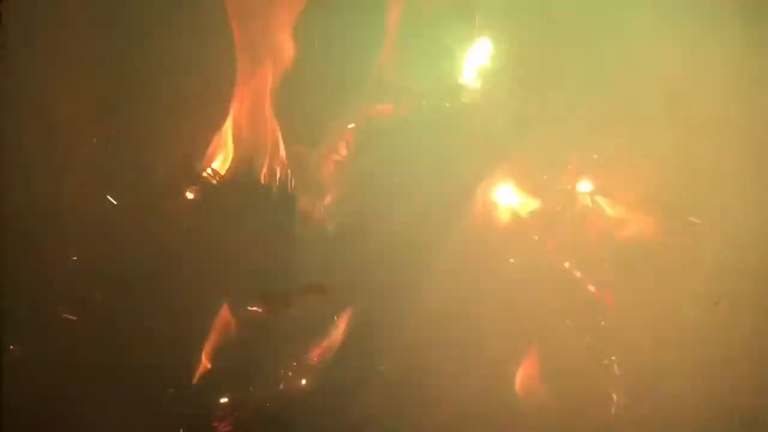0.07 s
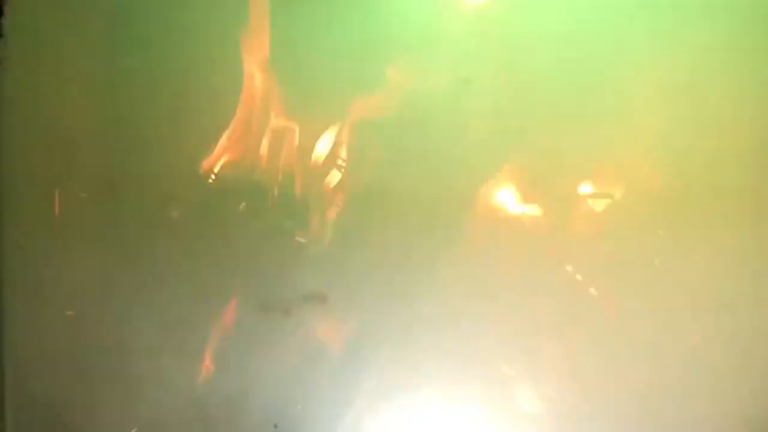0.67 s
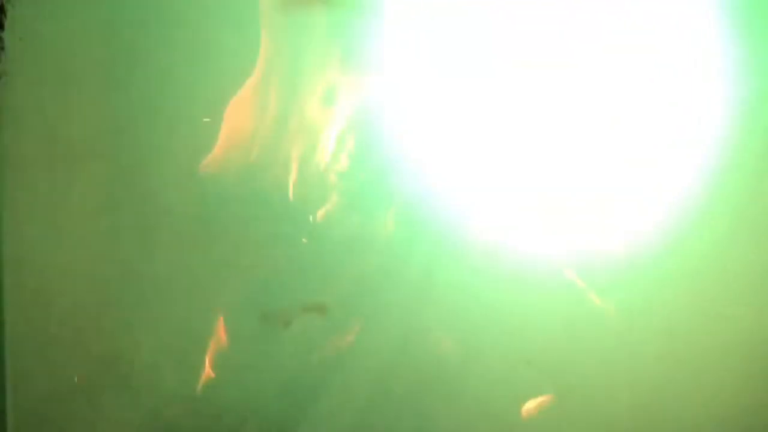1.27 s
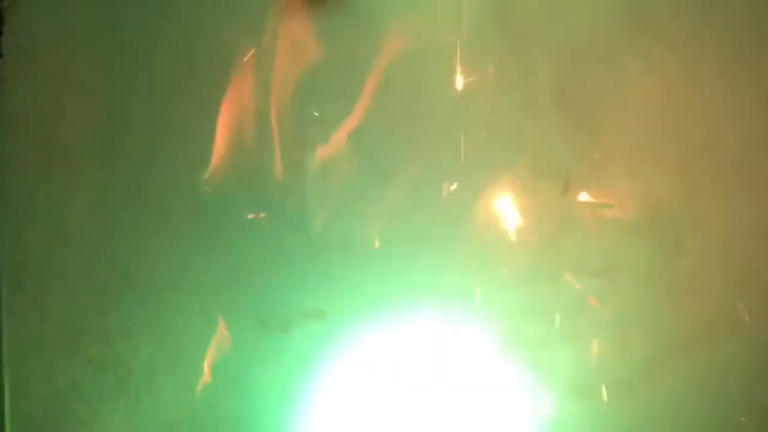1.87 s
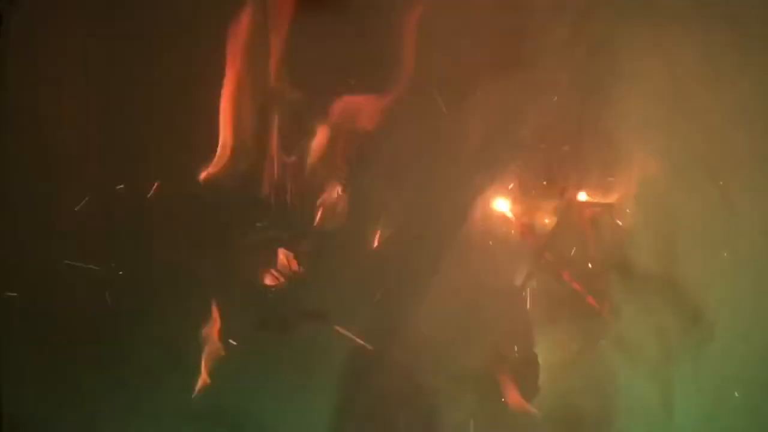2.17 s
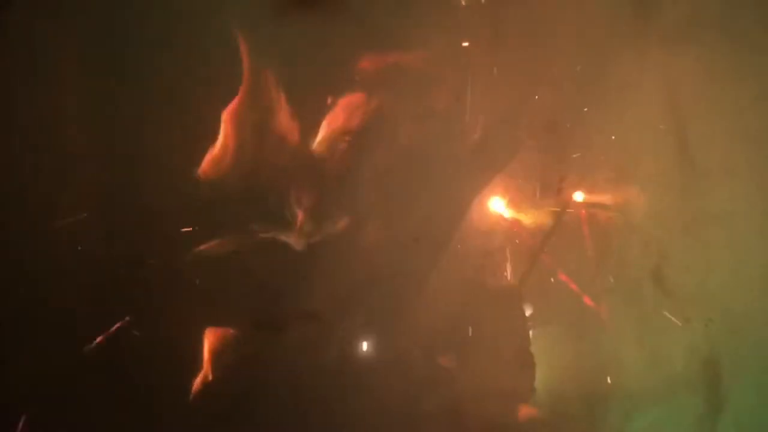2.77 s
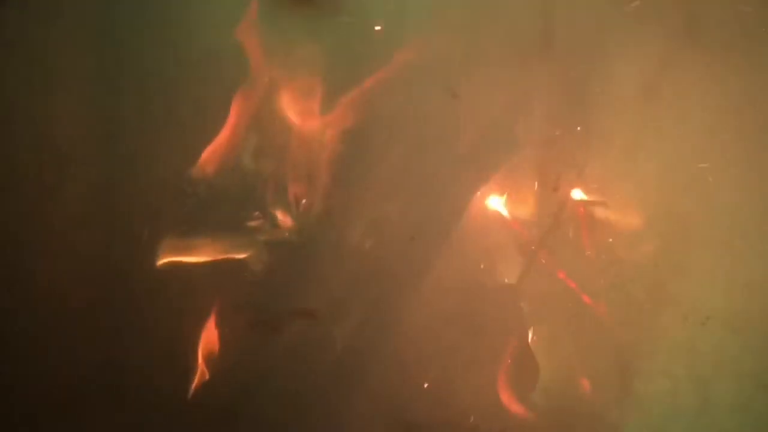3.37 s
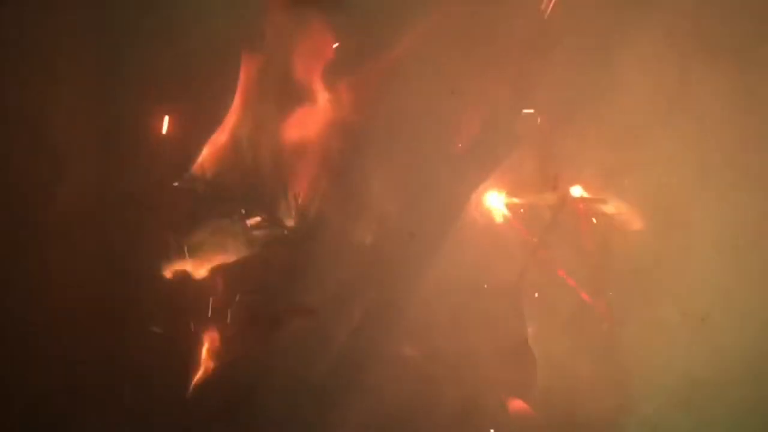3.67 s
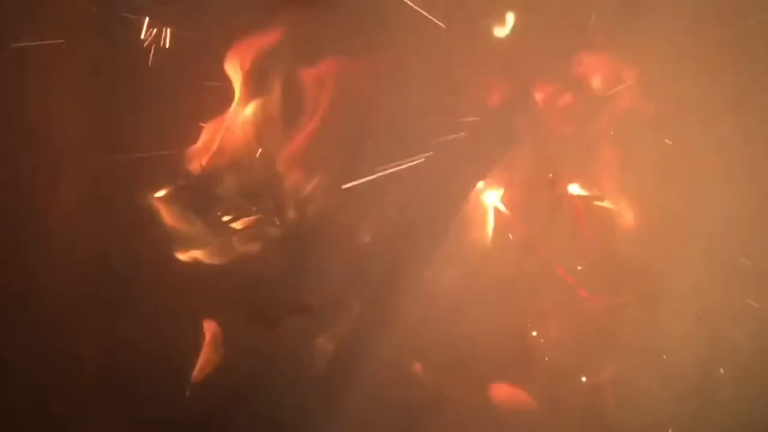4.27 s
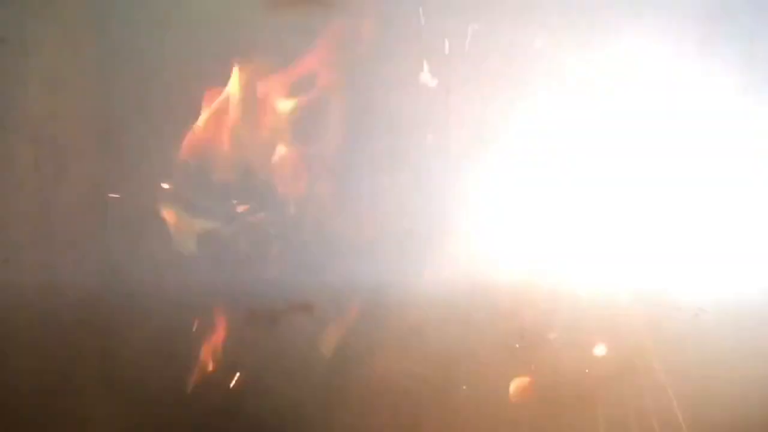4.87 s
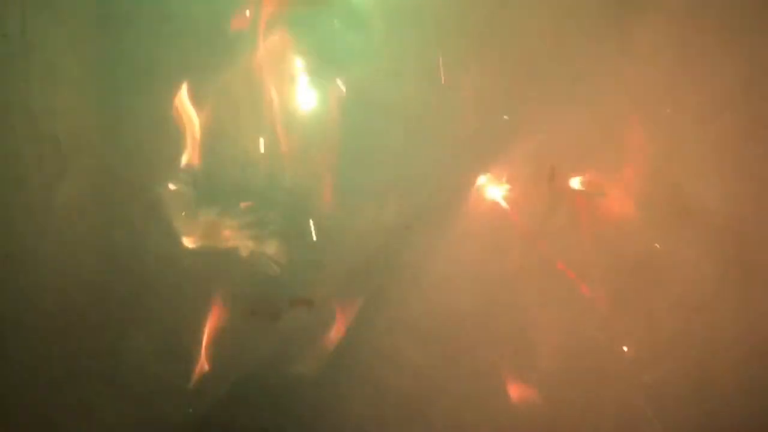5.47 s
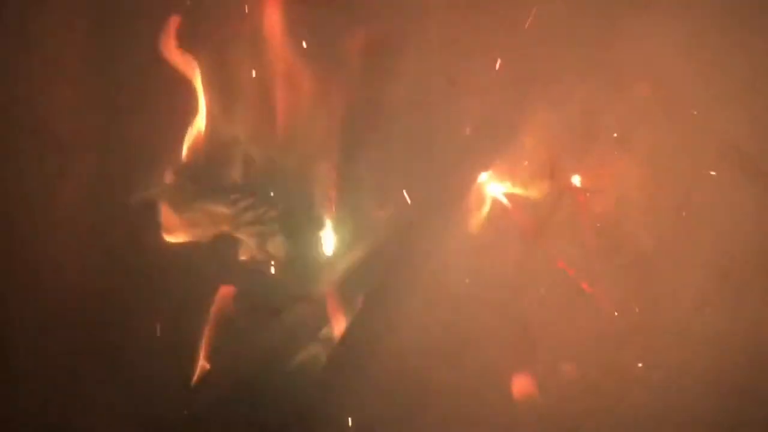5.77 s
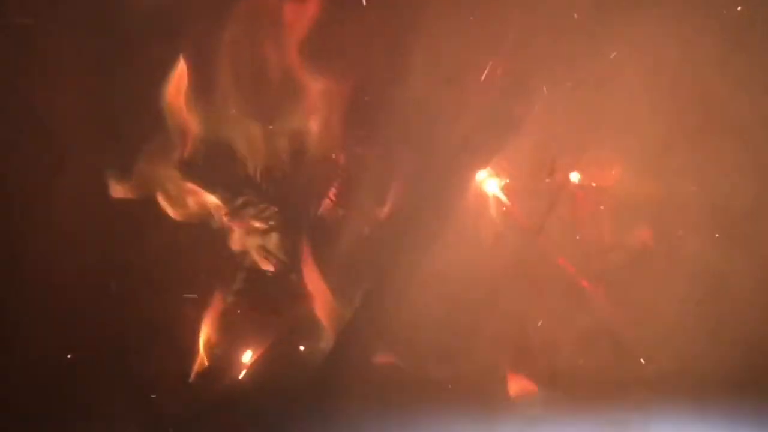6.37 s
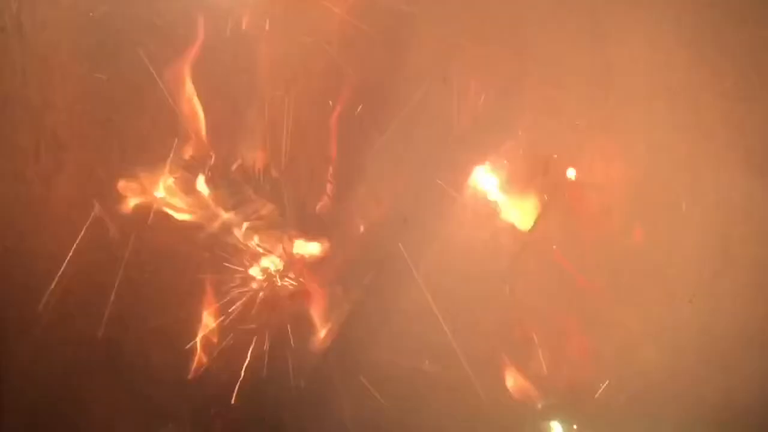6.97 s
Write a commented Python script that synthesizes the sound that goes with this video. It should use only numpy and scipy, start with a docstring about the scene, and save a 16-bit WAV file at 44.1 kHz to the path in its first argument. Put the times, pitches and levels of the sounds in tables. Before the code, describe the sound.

Muffled firework bangs, some in quick clusters, rattle around a closed fireplace stove while the fire rumbles softly and sparks crackle faintly.

```python
"""Small fireworks in a closed fireplace stove, heard from the room through its glass door.
At the start a pop is already ringing over the rumble of the draught and a faint crackle of sparks.
More follow unevenly for seven seconds, some in quick clusters. Each rattles round the firebox,
then leaves the iron body and the room ringing and the air in the flue swinging.
The sound has almost no treble; thin, bright ticks ride on the hardest pops."""
import sys
import numpy as np
from scipy import signal
from scipy.io import wavfile
from scipy.ndimage import uniform_filter1d

SR = 44100
rng = np.random.default_rng(int(sys.argv[2]) if len(sys.argv) > 2 else 0)


def put_to_file(sound):
    """Save the sound as 16-bit audio at rate SR, in the file named by the first command-line argument."""
    columns = np.atleast_2d(sound).T  # one column per channel
    safe = np.clip(columns, -1, 1)
    whole_steps = np.round(safe * 32767)
    wavfile.write(sys.argv[1], SR, whole_steps.astype(np.int16))


N = 310023

# The pops in the stove: (time [s], body level [dB], body pitch [Hz], boom pitch [Hz],
# boom re body [dB], crack re body [dB], shaking of the iron re pop [dB], puff of gas [dB])
POPS = [(-0.04, -21.5, 520, 200, -2.5, -9, 10.5, -25.5), (0.306, -22, 802, 155, -0.5, -3, 0.5, -21),
        (0.819, -10, 630, 178, -2, -15, 1.5, -28), (0.8497, -20.5, 695, 180, 6, -10.5, 1.5, -32),
        (1.627, -16, 543, 156, -6, -8.5, -4.5, -39.5), (1.6797, -27, 523, 138, -1, -15, 4, -48.5),
        (1.9093, -11, 545, 130, -4, -6.5, -1, -24), (2.1099, -24, 693, 118, 2, -6, 2, -35.5),
        (2.1646, -10, 690, 185, -2, -14, 1, -27), (2.1972, -15.5, 643, 171, 0.5, -12.5, 3.5, -24),
        (2.4177, -22, 670, 145, -1.5, -5, -0.5, -40.5), (2.708, -10, 690, 193, -4, -8, -2.5, -23),
        (2.9907, -21.5, 840, 173, 1.5, -5, 2.5, -18), (3.0986, -21.5, 610, 128, 1, -9.5, -8, -34),
        (3.4165, -36, 592, 139, 2.5, -7.5, -7, -39.5), (3.7082, -23.5, 518, 155, 15.5, -12.5, -5, -28),
        (3.91, -43, 658, 133, 13.5, -9, 0, -29.5), (3.955, -26, 580, 135, 2.5, -3, 0.5, -30.5),
        (4.2733, -45, 648, 120, 4.5, -7.5, 8.5, -29), (4.3176, -12, 710, 105, -2.5, -4, 1.5, -25.5),
        (4.4032, -20, 745, 131, -3.5, -2, 0, -26.5), (4.4503, -23, 695, 174, -11.5, -2.5, -5.5, -32),
        (4.685, -18.5, 736, 200, -5, -15, -1.5, -25.5), (4.997, -14.5, 766, 122, -5, -4, 0, -34),
        (5.1133, -10.5, 820, 157, -6, -6.5, -4, -37.5), (5.1818, -12, 566, 157, -2, -7.5, -3.5, -34.5),
        (5.4631, -23.5, 690, 177, -4, -9.5, -6.5, -33), (6.0204, -46, 760, 145, 5.5, -8, 3, -33),
        (6.0873, -11, 757, 185, -2.5, -8.5, 0, -39.5), (6.235, -13, 524, 178, 5.5, -12.5, -3, -29),
        (6.3179, -25.5, 610, 221, 2, -4, 4, -37), (6.5402, -30, 580, 97, 7, -9.5, -4.5, -23.5),
        (6.8769, -40.5, 610, 160, 8, 6.5, 5, -39)]


def fireworks(crack_hz=1654.0, rattle_t60_s=0.28, doubling_db=39.5):
    """Pops as (direct sound, shaking of the iron); where each bursts sets its colour and its shaking."""
    # The registers of boom, body and crack: (low edge [Hz], high edge [Hz])
    registers = [(70, 340), (340, 1280), (1280, 2600)]
    low, middle, high = registers
    direct, shaking = np.zeros((2, N))
    for time_s, level_db, body_hz, boom_hz, boom_db, crack_db, shake_db, puff_db in POPS:
        # a slow charge gives more gas for its bang and rattles longer
        t60 = rattle_t60_s * 2 ** ((puff_db - level_db) / doubling_db)
        boom = blast(level_db + boom_db, low, boom_hz, 1.36 * t60, spread=1.815, onset_db=-3.0)
        body = blast(level_db, middle, body_hz, t60, spread=1.59, onset_db=-7.5)
        crack = blast(level_db + crack_db, high, crack_hz, 0.96 * t60, spread=1.373, onset_db=-12.0)
        add(direct, time_s, boom + body + crack)
        add(shaking, time_s, from_db(shake_db) * (0.93 * boom + body + crack))
    return direct, shaking


def blast(level_db, edges_hz, centre_hz, t60, spread, onset_db, onset_t60=0.03, rise_s=0.00099):
    """One register of a pop: a crowd of reflections between the iron walls, draining evenly."""
    def colour(x):
        register = band(firebox(x), *edges_hz)
        return band(register, centre_hz / spread, centre_hz * spread, order=1)

    t = np.arange(SR // 2) / SR
    decay = dying(t, t60) + from_db(onset_db) * dying(t, onset_t60)
    envelope = decay * (1 - np.exp(-t / rise_s))
    reflections = rng.standard_normal(len(t))
    # dividing out chance swells keeps the decay even
    swells = np.sqrt(uniform_filter1d(colour(reflections) ** 2, size=600) + 1e-12)
    swells = np.roll(swells, -SR // 200)   # the resonances take a few milliseconds to answer
    sound = colour(envelope * reflections / swells)
    return from_db(level_db) * sound / np.std(sound[t < .03])


def firebox(x):
    """The air shut in the firebox resonates: modes in parallel, signs alternating."""
    # Air resonances: (frequency [Hz], width [Hz], level [dB])
    air_modes = [(92.6, 29, -2), (168.9, 42.7, -1), (216.8, 26.7, -1.5), (262.6, 42.2, -4.5),
                 (411.4, 102, -2.5), (524, 74, 5), (706.6, 80.3, 3.5), (824.5, 77.5, 3.5),
                 (1025, 214, -0.5), (1188.2, 115, 1.5), (1456.5, 90, -6), (1616, 200, -8),
                 (2000, 540, -13.5)]
    out = 0
    for k, (hz, width_hz, db) in enumerate(air_modes):
        radius = np.exp(-np.pi * width_hz / SR)
        poles = [1, -2 * radius * np.cos(2 * np.pi * hz / SR), radius ** 2]
        resonance = (1 - radius ** 2) / 2 * signal.lfilter([1, 0, -1], poles, x)
        out = out + (-1) ** k * from_db(db) * resonance
    return out


def stove_ring(shaking, ring_db=-45.0, build_s=0.0025):
    """A dense, slow ring of iron and room, with a few panel modes standing out."""
    # Lingering ring of stove and room: (frequency [Hz], spectral density re ring_db [dB], t60 [s])
    ring = [(60, -9, 3.7), (110, -8.5, 1.3), (234, -0.5, 1.64), (370, 4.5, 1.3), (520, -8, 1.37),
            (820, -2, 1.3), (1110, -4, 1.2), (1460, -10, 1.6), (2200, -4.5, 1.2)]
    # Modes of the stove's panels: (frequency [Hz], level [dB], t60 [s])
    panels = [(106, -69.5, 1), (554, -68.5, 0.33), (760, -71.5, 0.42)]
    t = np.arange(N) / SR
    response = 0
    for hz, noise in noise_bands():
        db, t60 = at_hz(ring, hz)
        response = response + from_db(ring_db + db) * noise * dying(t, t60)
    for hz, db, t60 in panels:
        response = response + from_db(db) * np.sin(2 * np.pi * hz * t) * dying(t, t60)
    build_up = 1 - np.exp(-t / build_s)
    return signal.fftconvolve(shaking, response * build_up)[:N]


def flue_swing(swing_hz=14, spread_hz=0.8, swing_db=8.5, gust_rise_s=0.008, hollow_hz=(29.5, 45.0)):
    """Each puff of gas rocks the air in the flue and stirs a low gust, which the flue makes hollow."""
    t = np.arange(SR) / SR
    out = np.zeros(N)
    for time_s, *_, puff_db in POPS:
        hz = rng.normal(swing_hz, spread_hz)
        swing = -np.sin(2 * np.pi * hz * t) * dying(t, t60=1)
        eddies = rng.standard_normal(SR) * dying(t, t60=0.55) * (1 - np.exp(-t / gust_rise_s))
        hollow = band(eddies, *hollow_hz, order=1)
        gust = band(hollow, low_hz=swing_hz, high_hz=86.0)
        gust = gust / np.std(gust[t < .1])
        add(out, time_s, from_db(puff_db) * (from_db(swing_db) * swing + gust))
    return out


def ticks():
    """Thin, bright ticks on the hardest peaks, far weaker than the pops they ride on."""
    # Single clicks: (time [s], level before the band-pass [dB])
    clicks = [(0.8305, -25), (1.9178, -23.5), (2.1704, -15), (2.1787, -16.5), (2.2038, -19), (2.7244, -24),
              (5.119, -19), (5.1896, -20.5)]
    out = np.zeros(N)
    for time_s, db in clicks:
        add(out, time_s, from_db([db]))
    return band(out, low_hz=2000, high_hz=7400)


def fire(throb_db=-34.0, flutter_db=-50.5, roar_db=-53.5):
    """The draught throbs very low; the flames flutter and give a soft roar, coloured by the firebox."""
    throb = rms_one(band(rng.standard_normal(N), 9, 20))
    flutter = rms_one(band(rng.standard_normal(N), 25, 70))
    roar = rms_one(band(firebox(rng.standard_normal(N)), 40, 453, order=1))
    return from_db(throb_db) * throb + from_db(flutter_db) * flutter + from_db(roar_db) * roar


def sparks(per_s=36.0, level_db=-62.0, spread_db=3.0):
    """Tiny crackles at random, each rattling round the firebox."""
    fires = rng.random(N) < per_s / SR
    clicks = fires * from_db(spread_db * rng.standard_normal(N))
    t = np.arange(SR // 4) / SR
    reflections = rng.standard_normal(len(t)) * dying(t, t60=0.13)
    rattle = signal.fftconvolve(clicks, reflections)[:N]
    return from_db(level_db) * rms_one(band(firebox(rattle), 500, 2000))


def from_db(db):
    """Decibels to gain."""
    return 10 ** (np.asarray(db) / 20)


def rms_one(x):
    """Scale to unit rms."""
    return x / np.sqrt(np.mean(x ** 2) + 1e-20)


def dying(t, t60):
    """Exponential decay, 60 dB down after t60 seconds."""
    return np.exp(-np.log(1000) * t / t60)


def band(x, low_hz, high_hz, order=2):
    """Causal band-pass."""
    return signal.sosfilt(signal.butter(order, [low_hz, high_hz], "band", fs=SR, output="sos"), x)


def at_hz(table, hz):
    """The columns of a table, read at one frequency."""
    pitch, *columns = np.transpose(table)
    return [np.interp(np.log(hz), np.log(pitch), column) for column in columns]


def noise_bands():
    """Third-octave bands of unrelated noise, as (centre [Hz], noise)."""
    edges_hz = 36 * 2 ** (np.arange(20) / 3)
    return [(np.sqrt(low * high), band(rng.standard_normal(N), low, high))
            for low, high in zip(edges_hz, edges_hz[1:])]


def add(out, time_s, sound):
    """Mix a sound in at a time, which may lie before the start."""
    start = round(time_s * SR)
    sound = sound[max(0, -start):]
    start = max(0, start)
    out[start:start + len(sound)] += sound[:N - start]


def scene():
    """From the room, one microphone: pops and sparks ring through the stove, over flue and fire."""
    pops, shaking = fireworks()
    crackle = sparks()
    ringing = stove_ring(shaking + crackle)
    return (pops + crackle + ringing + flue_swing() + fire())[None]


def record(dry, gain_db=-0.5, ceiling=0.97, treble_edge_hz=2235, rasp_db=-37.5, cutoff_hz=15800):
    """Peaks are rounded and the treble is cut steeply; only faint rasp and the ticks lie above."""
    low_cut = signal.butter(2, 6, "high", fs=SR, output="sos")
    treble_cut = signal.firwin(2001, treble_edge_hz, fs=SR)
    top_cut = signal.ellip(8, .1, 70, cutoff_hz, fs=SR, output="sos")
    picked_up = signal.sosfilt(low_cut, from_db(gain_db) * dry)
    rounded = picked_up / (1 + (picked_up / ceiling) ** 4) ** .25
    dull = signal.fftconvolve(rounded, treble_cut[None], mode="same")
    rasping = dull + from_db(rasp_db) * dull ** 2
    return signal.sosfilt(top_cut, rasping + ticks())


dry = scene()
out = record(dry)
put_to_file(out)
```